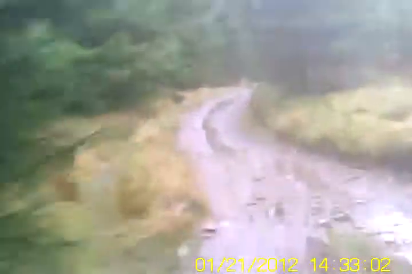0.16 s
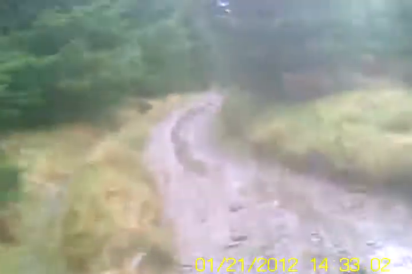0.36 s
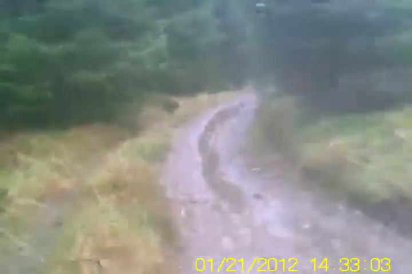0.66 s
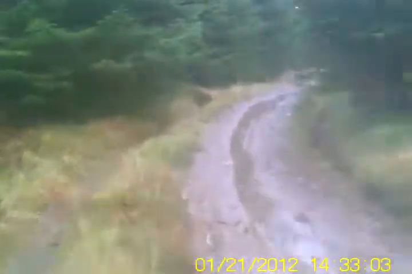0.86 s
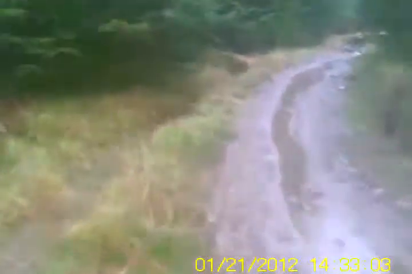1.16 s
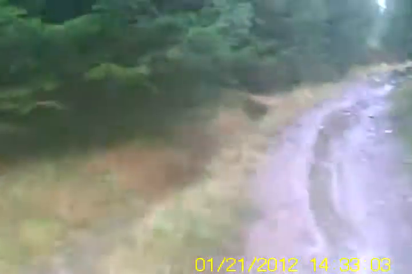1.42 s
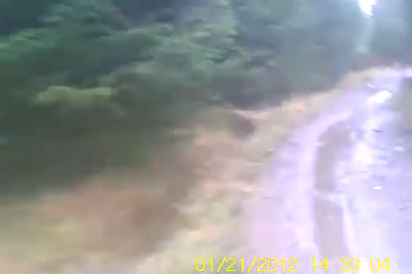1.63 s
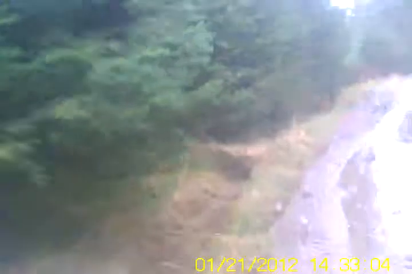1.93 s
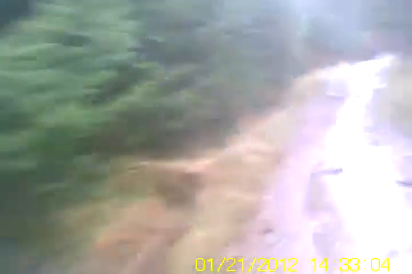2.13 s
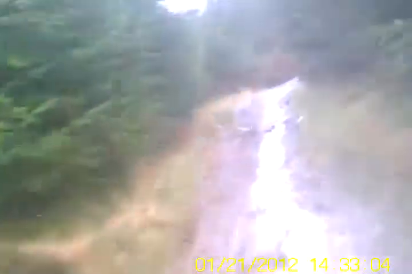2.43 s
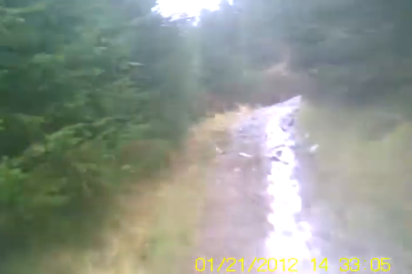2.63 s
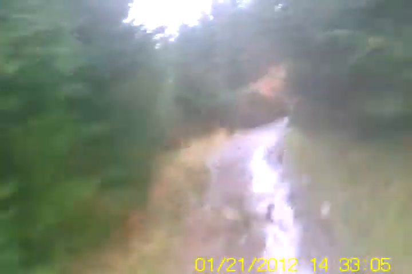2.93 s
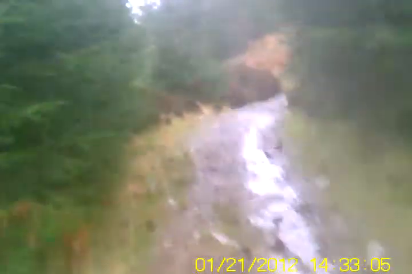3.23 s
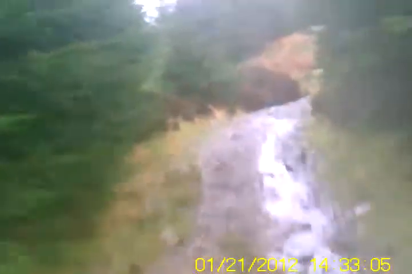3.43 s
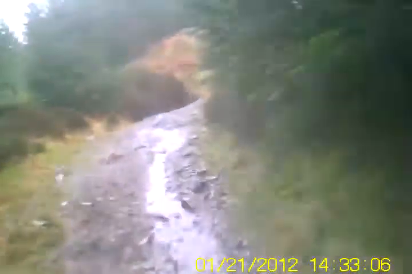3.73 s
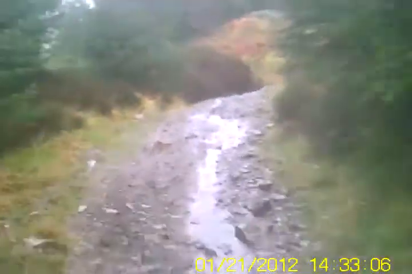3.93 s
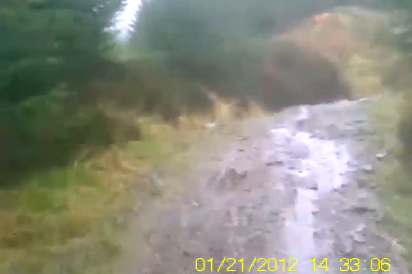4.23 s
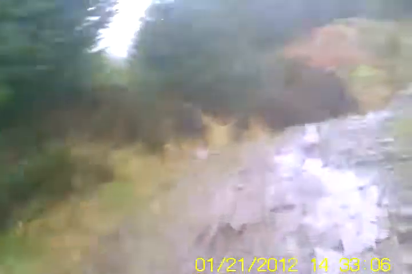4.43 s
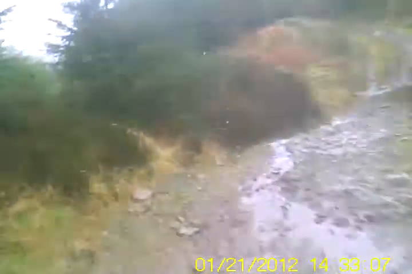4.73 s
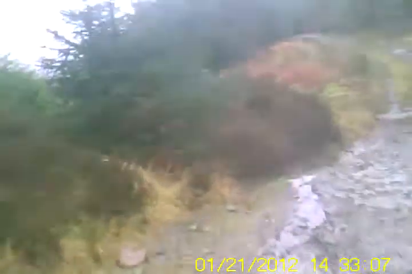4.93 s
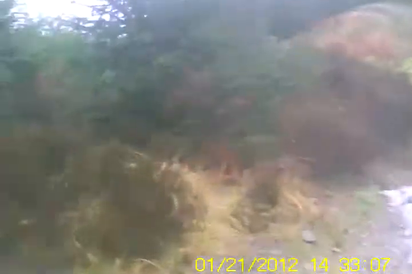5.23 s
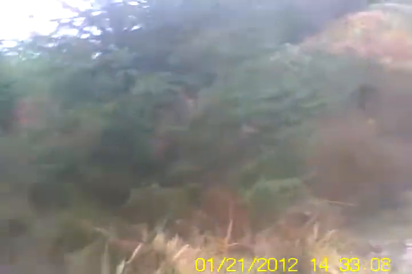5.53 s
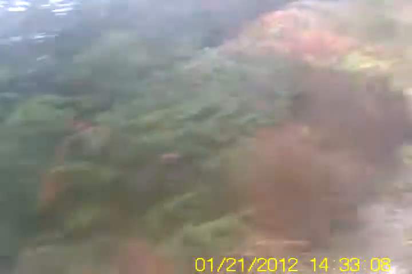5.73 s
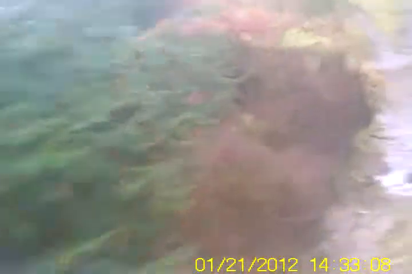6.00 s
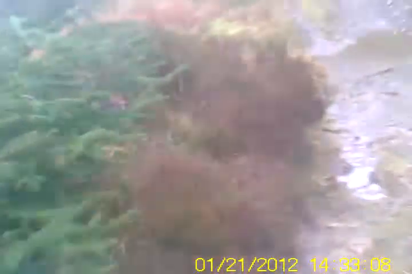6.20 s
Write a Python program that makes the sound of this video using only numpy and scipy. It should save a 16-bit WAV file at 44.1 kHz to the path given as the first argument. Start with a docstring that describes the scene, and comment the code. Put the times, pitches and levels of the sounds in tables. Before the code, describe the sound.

A mountain bike rolls along a wet, stony forest track, heard close from a small microphone riding with it. For the first second the plastic mount clatters and creaks over low wind rumble, soft thumps and crunching grit. The ride is calmer until about 2.6 seconds, when the tyres enter water and a fine spray hisses. A sharp plastic crack and a jolt come at 3 seconds. Rattling, stone knocks and gravel crunch then build, peaking around 4.5 seconds. A faint brake whine starts at 4.7 seconds. At 5 seconds the wet disc brake breaks into loud, stuttering, rasping squeals. From about 5.6 seconds it holds one harsh, buzzing, high screech that slightly overloads the microphone, while wind and tyre noise drop away. It releases at 6.1 seconds, leaving a short dull echo from the trees and a couple of faint ticks.

```python
"""Mountain bike braking on a wet forest track

A small camera rides along over stony ground. Turbulence rumbles at its microphone, the tyres crunch
grit and throw spray, and jolts make the mount thump, creak and chatter. Then a wet disc brake bites:
stick-slip friction drives the disc into a squeal, the trees echo it, and the microphone overloads."""
import sys
import numpy as np
from scipy import signal
from scipy.fft import rfft, irfft
from scipy.io import wavfile
from scipy.ndimage import uniform_filter1d

SR = 44100
rng = np.random.default_rng(int(sys.argv[2]) if len(sys.argv) > 2 else 0)


def bounce(signal):
    """Save signal as a 16-bit WAV file at the path given by the first command-line argument."""
    frames = np.transpose(np.atleast_2d(signal))
    limited = np.clip(frames, -1, 1)
    pcm = np.round(limited * 32767).astype(np.int16)
    wavfile.write(sys.argv[1], SR, pcm)


N = 280476
TIME = np.arange(N) / SR
TOUCH_S, BITE_S, LOCK_S, RELEASE_S = 4.694, 5.0, 5.56, 6.088  # stages of the brake pads' contact
WATER_S = 2.576  # the tyres enter running water


# the disc's lowest mode while the pads bite: time_s, level_db
BITE_LEVEL = [(5.0, -21), (5.07, -17), (5.102, -6.5), (5.15, -9), (5.194, -20), (5.21, -5.5), (5.24, -16),
              (5.28, -4), (5.31, -14), (5.385, -20), (5.45, -9), (5.528, -14.5), (5.55, -4.5)]
# the locked pads briefly lose grip: time_s, recovery_s, buzz_dip_db
GRIP_LOSSES = [(5.644, .011, -8.5), (5.693, 0.006, -4.5), (5.77, .011, -12.5), (5.806, 0.0076, -21),
               (5.882, 0.0092, -5.5), (5.914, 0.0092, -9), (6.046, 0.013, -10.5), (6.067, 0.0035, -11.5)]

def brake(hold_db=-8.5, octave_db=-9, coupling_db=-4.5, drag_db=-24.5):
    """Self-excited vibration: friction feeds two disc modes and couples them nonlinearly."""
    locked = after(LOCK_S, ramp_s=0.017)
    slip_db = sum(db * np.exp(-((TIME - s) / recovery_s) ** 2) for s, recovery_s, db in GRIP_LOSSES)
    phase = 2 * np.pi * np.cumsum(disc_pitch(slip_db)) / SR
    level_db = (1 - locked) * curve(BITE_LEVEL) + locked * (hold_db + 0.6 * slip_db)
    swing = braking() * gain_of(level_db + 1.5 * wander(65))
    low = swing * np.cos(phase)
    octave = swing * np.cos(2 * phase + 0.5 * wander(42)) * gain_of(octave_db + 4.2 * wander(53))
    high = octave + shrieks()
    buzz = locked_buzz(phase, locked, slip_db)
    rasp = pad_rasp(phase, drag=gain_of(drag_db) * swing * (1 - locked))
    coupled = butterworth(high * (low + high / 2), 4, 2200, "high")  # sum tone and upper mode's octave
    return low + high + gain_of(coupling_db) * (1 - locked) * coupled + buzz + rasp


def disc_pitch(slip_db, disc_hz=907, sharp_hz=47.98, settle_s=0.1, lock_rise_hz=23.97, sink_hz_per_s=27):
    """Contact stiffness tunes the lowest mode: grip raises it, slips and the slowing wheel lower it."""
    settling = sharp_hz * np.exp(-(since(BITE_S) / settle_s) ** 2)
    held = after(LOCK_S) * (lock_rise_hz - sink_hz_per_s * (TIME - LOCK_S))
    waver = 1 + 0.0055 * wander(55)  # the disc is uneven
    return (disc_hz + settling + held + 1.52 * slip_db) * waver


def braking(release_db_per_s=612):
    """Friction's drive: 1 while the pads bite, decaying exponentially once they let go."""
    return after(BITE_S) * gain_of(-release_db_per_s * since(RELEASE_S))


# bursts of the disc's upper mode: peak_s, length_s, level_db, pitch_hz
SHRIEK_BURSTS = [(5.062, 0.049, -14, 1830), (5.142, 0.066, -5.5, 1827), (5.182, 0.047, -6, 1740),
                 (5.346, 0.14, -11.5, 1830), (5.469, 0.026, -8.5, 1832), (5.513, 0.053, -4.5, 1802),
                 (5.772, 0.054, -4.5, 1813), (5.979, 0.23, -13, 1854), (6.093, 0.034, -7.5, 1845)]

def shrieks(waver=0.00922):
    """Modal instability: the upper mode runs free in short, unsteady bursts near the octave."""
    clock = np.cumsum(1 + waver * wander(108)) / SR
    return sum(gain_of(db) * swell(s, length) * np.cos(2 * np.pi * hz * clock)
               for s, length, db, hz in SHRIEK_BURSTS)


# spectrum of the locked pads' buzz: frequency_hz, level_db
BUZZ_SPECTRUM = [(1900, -11.5), (2750, 3), (4650, 1), (5500, 2), (5900, -13), (6500, -6), (7300, -12),
                 (9250, -2.5), (9900, -13), (11200, -15), (13000, -26), (15000, -51)]
# spectrum of their scrape: frequency_hz, level_db
SCRAPE_SPECTRUM = [(2000, -14), (5250, 4), (5900, -10), (8100, 5.5), (9300, 6.5), (9900, -4), (15000, -43)]

def locked_buzz(phase, locked, slip_db, level_db=-17, scrape_db=-11.5):
    """Sustained stick-slip: the locked pads add harsh harmonics and noise pulsing at the disc's pitch."""
    harmonics = evened(colour(stick_slip(phase, jitter_rad=0.105, scrape_db=-15), BUZZ_SPECTRUM))
    pulsed_noise = np.exp(np.cos(phase)) * rng.standard_normal(N)
    scrape = patchy(colour(pulsed_noise, SCRAPE_SPECTRUM), depth_db=-3.5) * gain_of(scrape_db)
    envelope = locked * braking() ** 1.35 * gain_of(level_db + slip_db + 0.5 * wander(87))
    return (harmonics + scrape) * envelope


# brief grabs of the pads: start_s, length_s, force_db
PAD_GRABS = [(5.085, 0.067, -23.5), (5.098, 0.009, -10), (5.125, 0.0094, -13), (5.166, 0.0075, -20.5),
             (5.217, 0.0023, -22), (5.281, 0.011, -5.5), (5.32, 0.016, -17), (5.392, 0.0204, -25.5),
             (5.445, 0.047, -19.5), (5.532, 0.018, -25), (5.549, 0.021, -6)]
# spectrum of a grabbing pad: frequency_hz, level_db
RASP_SPECTRUM = [(400, -3), (1200, 4), (2600, 0), (5400, -1), (6500, -16), (9200, -15.5), (13000, -29),
                 (16000, -52.5)]

def pad_rasp(phase, drag):
    """Irregular stick-slip: the rasp grows with pad force, and its hiss grows faster still."""
    friction = stick_slip(phase, jitter_rad=0.34, scrape_db=-3.5)
    force = drag.copy()
    for s, length, db in PAD_GRABS:
        add(force, s, gain_of(db) * signal.windows.tukey(int(length * SR), 0.25))
    return colour(friction, RASP_SPECTRUM) * force + colour(friction, CRACK_SPECTRUM) * force ** 1.49


def stick_slip(phase, jitter_rad, scrape_db):
    """Relaxation oscillation: one slip a cycle, early or late, with a scrape that flares on grit."""
    slip_phase = phase + jitter_rad * wander(240)
    harmonics = evened(sum(gain_of(1.3 * wander(50)) * np.cos(k * slip_phase) for k in range(3, 16)))
    scrape = evened(np.exp(np.cos(phase)) * rng.standard_normal(N) * gain_of(3.5 * wander(18)))
    return evened(harmonics + gain_of(scrape_db) * scrape)


def rub(disc_hz=918, waver_hz=30, level_db=-28.5):
    """Narrow-band resonance: light pad friction stirs the lowest mode into a faint, broken whine."""
    touching = after(TOUCH_S, ramp_s=0.13) * (1 - after(LOCK_S))
    phase = 2 * np.pi * disc_hz * TIME
    whine = wander(waver_hz) * np.cos(phase) + wander(waver_hz) * np.sin(phase)
    return whine * touching * gain_of(level_db)


def ring_out(pitch_hz=1838, level_db=-23, decay_db_per_s=130):
    """Free decay: the released disc's upper mode dies away."""
    envelope = after(RELEASE_S) * gain_of(level_db - decay_db_per_s * since(RELEASE_S))
    return envelope * np.cos(2 * np.pi * pitch_hz * TIME)


# how hard the bike runs, from speed and rough ground together: time_s, level_db
RIDE_LEVEL = [(0.0, -34), (0.64, -38), (2.41, -33), (3.63, -28.5), (4.55, -21), (4.72, -23.5),
              (5.12, -24.5), (5.61, -57), (6.17, -58), (6.36, -56)]

def ride_db():
    """Strength of the ground's excitation, relative to the hardest stretch."""
    level = curve(RIDE_LEVEL)
    return level - level.max()


# patches of loose gravel: middle_s, length_s, boost_db
GRAVEL_PATCHES = [(1.673, 0.1, 3.5), (4.497, 0.085, 9.5)]
# spectra of the shaken frame, the crunching grit and the spray: frequency_hz, level_db
RUMBLE_SPECTRUM = [(60, -18.5), (140, 0.5), (300, 3), (500, -3), (750, -12), (1300, -14), (3000, -96)]
GRIT_SPECTRUM = [(250, -11), (700, 7), (1400, 5), (1750, 10), (2300, 1.5), (3400, 0.5), (4600, -11.5),
                 (8000, -39), (14000, -64)]
SPRAY_SPECTRUM = [(1500, -0.5), (3500, 3), (4800, -6), (5900, 7), (7000, -5.5), (8300, 0), (10000, -14.5),
                  (12300, -25)]

def tyres(water_db=6, drying_db_per_s=9, skid_db=14):
    """Shot noise: clumps of grit shake the frame, crunch under the tread and fly off with the water."""
    clumps, ride = wander(45), ride_db()
    gravel_db = sum(db * swell(s, length) for s, length, db in GRAVEL_PATCHES)
    wet_db = water_db * after(WATER_S, ramp_s=0.004) - drying_db_per_s * since(TOUCH_S)
    skidding = after(LOCK_S) * braking()
    rumble = colour(impacts(per_s=2500, spread_db=3), RUMBLE_SPECTRUM)
    rumble *= gain_of(-33.5 + 0.65 * ride + 4.6 * clumps)
    grit = patchy(colour(impacts(per_s=4000, spread_db=4), GRIT_SPECTRUM), depth_db=3)
    grit *= gain_of(-28.5 + 0.54 * ride + clumps + wander(100) + skid_db * skidding)
    spray = patchy(colour(impacts(per_s=9000, spread_db=3.5), SPRAY_SPECTRUM), depth_db=4.5)
    spray *= gain_of(-43.5 + 0.28 * ride + 2 * clumps + wander(120) + wet_db)
    return (rumble + grit + spray) * gain_of(gravel_db)


# stones knocked by the tyres: start_s, force_db, pitch_hz
STONE_KNOCKS = [(0.211, -15, 1780), (0.257, -12, 1670), (2.946, -11.5, 2020), (3.056, -6.5, 2800),
                (3.083, -15.5, 1590), (3.3196, -13.5, 1380), (3.398, -12, 1920), (3.4246, -13.5, 1920),
                (3.999, -12, 2370), (4.239, -9.5, 1940), (4.287, -9.5, 2190), (4.457, -9.5, 1890),
                (4.4857, -9.5, 1830), (4.839, -11.5, 1890)]

def stones(decay_s=0.0069, bandwidth_hz=900, direct_share=0.34):
    """Damped resonance: a skidding stone's short crunch is coloured by its own broad mode."""
    t, out = TIME[:SR // 10], np.zeros(N)
    for s, db, hz in STONE_KNOCKS:
        force = np.exp(-t / decay_s) * rng.standard_normal(len(t))
        body = signal.lfilter(*signal.iirpeak(hz, hz / bandwidth_hz, fs=SR), force)
        add(out, s, gain_of(db) * (body + direct_share * force))
    return colour(out, GRIT_SPECTRUM) / 2


# bursts of slaps in the plastic mount: start_s, length_s, force_db
CHATTER_BURSTS = [(.0066, 0.013, -10), (0.0949, .018, -5), (.1271, 0.0031, -6.5), (0.2944, 0.0043, -4),
                  (0.3081, 0.0093, 0), (0.5409, 0.0071, -12), (.6407, 0.0093, -10), (0.7341, 0.0074, -6),
                  (.9892, 0.0025, -7.5), (0.9997, 0.0019, -3), (1.1625, 0.004, -10.5),
                  (2.2696, 0.00092, -5), (2.3605, 0.0027, -8.5), (2.9921, 0.011, 5.5), (3.0442, 0.0041, -4),
                  (3.3764, 0.0043, -10), (3.4569, 0.018, -0.5), (3.499, 0.0056, -1.5), (3.5388, 0.01, -6),
                  (3.5804, 0.012, -7.5), (3.634, 0.00027, -4), (3.908, 0.0038, -3), (3.9825, 0, 2.5),
                  (3.9986, .004, 1), (4.0517, 0.014, -3), (4.1098, 0, -4), (4.1876, 0.013, -7.5),
                  (4.2391, 0.0032, -1.5), (4.2865, 0.0066, -2.5), (4.3865, 0, 1.5), (4.4464, 0.018, -5),
                  (4.4982, 0.012, -3.5), (4.5581, 0.0076, 0.5), (4.5753, 0, -2.5), (4.595, 0.0072, -4),
                  (4.6545, 0.00055, 8.5), (4.678, 0.0053, -3.5), (4.7337, 0.0093, -8), (6.303, 0.0025, -27),
                  (6.336, .004, -29)]
# spectrum of one slap: frequency_hz, level_db
SLAP_SPECTRUM = [(100, -5), (500, 10.5), (1200, 4), (3500, 3.5), (5500, 0.5), (7000, -10), (9200, -4.5),
                 (10500, -17), (13000, -27.5), (16000, -56)]

def chatter(spacing_s=0.0046, rebound_db=-20, rattle_per_s=10, rattle_db=-12):
    """Contact rattle: loose parts slap milliseconds apart, and each slap sheds tiny rebounds."""
    # light slaps fall at random between the bursts, harder the rougher the ride
    slaps = (rng.random(N) < rattle_per_s / SR) * gain_of(rattle_db + ride_db() + 2 * rng.standard_normal(N))
    bounces = impacts(per_s=5000, spread_db=3)
    chances = rng.uniform(-1, 1, (len(CHATTER_BURSTS), 2, 12))
    for (s, length, db), chance in zip(CHATTER_BURSTS, chances):
        steps = np.linspace(0, 1, round(length / spacing_s) + 1)
        for progress, late, size in zip(steps, *chance):
            arch = np.sin(np.pi * progress)  # a burst is strongest in its middle
            slap_s = s + progress * length + late * arch * spacing_s / 10
            add(slaps, slap_s, gain_of([db + 2 * arch + 2 * size]))
    rebounds = signal.oaconvolve(slaps, np.exp(-TIME[:1000] / 0.0015))[:N] * bounces
    return colour(slaps + gain_of(rebound_db) * rebounds, SLAP_SPECTRUM) * gain_of(3.5)


# cracks that end the hardest slaps: start_s, force_db
PLASTIC_CRACKS = [(0.31, -11), (2.994, 1), (3.0046, -3), (4.564, -7)]
# spectrum of a crack, and of the pads' hiss: frequency_hz, level_db
CRACK_SPECTRUM = [(3500, -21.5), (5500, -4), (9000, -4), (15000, -24.5)]

def cracks(decay_s=0.00066):
    """Hard impact: a very brief contact of plastic gives a wide, bright spectrum."""
    t, out = TIME[:SR // 10], np.zeros(N)
    for s, db in PLASTIC_CRACKS:
        add(out, s, gain_of(db) * np.exp(-t / decay_s) * rng.standard_normal(len(t)))
    return colour(out, CRACK_SPECTRUM)


# jolts that heave the bike: peak_s, level_db, swing_hz
JOLT_PULSES = [(.266, -12, 32), (1.033, -16, 32), (1.118, -19, 150), (1.123, -14, 34), (3.055, -9, 22),
               (3.51, -8, 21), (4.234, -8, 130), (4.24, -10, 270), (4.248, -8, 28), (4.605, -10, 20),
               (5.56, -16, 70)]

def jolts():
    """Pressure pulse: the bike dips, is thrown up and settles in one slow swing."""
    out = np.zeros(N)
    for s, db, hz in JOLT_PULSES:
        phase_squared = (np.pi * hz * (TIME - s)) ** 2
        out += gain_of(db) * (1 - 2 * phase_squared) * np.exp(-np.minimum(phase_squared, 20))
    return out


# creaks of the flexing mount: start_s, relative_level_db, glide_ratio
MOUNT_CREAKS = [(0.019, -29.5, -.1), (0.099, -24, -0.33), (0.222, -29.5, -0.036), (0.518, -29, 0.27),
                (0.654, -30.5, 0.13), (0.722, -33, 0.29), (0.992, -33, -.1), (2.996, -19.5, -0.16),
                (3.463, -24, -0.32), (3.525, -28, 0.37), (4.371, -28.5, 0.28), (4.558, -20.5, -0.28),
                (4.654, -25, -.25), (5.222, -27.5, 0.24), (5.787, -33.5, 0.2), (6.177, -39.5, 0.18)]

def creaks(middle_hz=418, bend=0.12, roughness=0.38):
    """Friction under flexure: the mount's short, grainy groan glides with the load."""
    out = np.zeros(N)
    for s, db, glide in MOUNT_CREAKS:
        length_s = 0.05 * gain_of(db) ** 0.14  # a harder creak lasts longer
        position = np.linspace(-1, 1, int(length_s * SR))
        hz = middle_hz * (1 + glide * position / 2 + bend * position ** 2)
        add(out, s, gain_of(db) * np.sqrt(1 - position ** 2) * np.sin(2 * np.pi * np.cumsum(hz) / SR))
    return out * (1 + roughness * wander(156)) * gain_of(3)


# flicked stones striking metal: start_s, pitch_hz, level_db
METAL_PINGS = [(2.738, 1570, -14), (4.8735, 1690, -15)]

def pings(decay_s=0.009):
    """Impulse response: struck metal rings in one short, gritty note."""
    t, out = TIME[:SR // 10], np.zeros(N)
    for s, hz, db in METAL_PINGS:
        add(out, s, gain_of(db) * np.exp(-t / decay_s) * np.sin(2 * np.pi * hz * t))
    return out * (1 + 0.5 * wander(540))


def splash(peak_s=2.965, length_s=0.92, level_db=-40, lowest_hz=3200):
    """Superposed droplet impacts: a fine hiss swells and passes as the front tyre meets the water."""
    drops = colour(impacts(per_s=16000, spread_db=11), SPRAY_SPECTRUM)
    hiss = evened(butterworth(drops, 4, lowest_hz, "high"))
    return hiss * gain_of(level_db) * after(WATER_S, ramp_s=0.004) * swell(peak_s, length_s)


# wet grit leaving the tyre: peak_s, level_db
GRIT_SPITS = [(2.939, -29.5), (4.919, -25.5), (4.952, -17.5)]

def spits(length_s=0.012):
    """Noise transients: the tyre flings off wet grit in brief bursts of spray."""
    envelope = sum(gain_of(db) * swell(s, length_s) for s, db in GRIT_SPITS)
    return colour(rng.standard_normal(N) * envelope, SPRAY_SPECTRUM)


# air rushing over the microphone: time_s, relative_level_db
WIND_LEVEL = [(0.0, -31.5), (0.67, -43.5), (2.25, -37), (3.79, -29), (5.0, -32.5), (5.72, -59.5),
              (6.36, -44)]
# spectrum of its turbulence: frequency_hz, level_db
WIND_SPECTRUM = [(10, -4.5), (22, 6.5), (35, -4.5), (55, -8), (74, -2.5), (105, -12), (180, -24),
                 (400, -66.5)]

def wind(gain_db=8, gust_hz=8.9, sway_hz=31.8, sway_db=-26.5):
    """Turbulent pressure: low gusts buffet the microphone, over the slow sway of the camera."""
    turbulence = evened(colour(rng.standard_normal(N), WIND_SPECTRUM))
    gusts = turbulence * gain_of(gain_db + curve(WIND_LEVEL) + wander(gust_hz))
    sway = wander(sway_hz) * gain_of(sway_db + 0.22 * ride_db())
    return gusts + sway


def forest(x, reverb_s=0.58, top_hz=1400):
    """Scattering with motion shift: trunks ahead return dull echoes higher, those behind lower."""
    t, out = TIME[:SR], np.zeros(N)
    for approach, delay_s, db in [(0.084, 0.09, -0.5), (0.045, 0.026, -0.5), (-0.11, 0.02, -10)]:
        shifted = np.interp(TIME - delay_s + approach * (TIME - RELEASE_S), TIME, x)
        tail = rng.standard_normal(SR) * gain_of(-60 * t / reverb_s)
        out += signal.fftconvolve(shifted, gain_of(db) * tail / np.linalg.norm(tail))[:N]
    return butterworth(out, 2, top_hz, "low")


def impacts(per_s, spread_db):
    """Random impulses, most small and a few large, at rms 1."""
    size = gain_of(spread_db * np.minimum(rng.exponential(1, N), 4))
    return evened(size * rng.choice([-1, 1], N) * (rng.random(N) < per_s / SR))


def patchy(x, depth_db):
    """Spectral flicker: each grain has its own pitch, so narrow bands flare for milliseconds."""
    bands = signal.stft(x, nperseg=256, noverlap=192)[2]
    across_bands = uniform_filter1d(rng.standard_normal(bands.shape), size=4, axis=0)
    patches = evened(uniform_filter1d(across_bands, size=6, axis=1))
    return evened(signal.istft(bands * gain_of(depth_db * patches), nperseg=256, noverlap=192)[1][:N])


def colour(x, spectrum):
    """Minimum-phase filter of unit energy with the given spectrum."""
    hz, db = np.transpose(spectrum)
    f = abs(np.fft.fftfreq(2 ** 13, 1 / SR))
    rolloff_db = 40 * np.log10(np.maximum(f / hz[-1], 1))
    log_gain = np.log(gain_of(np.interp(np.log(f + 1), np.log(hz), db) - rolloff_db))
    taps = np.fft.ifft(np.exp(np.conj(signal.hilbert(log_gain)))).real[:len(f) // 2]
    return signal.oaconvolve(x, taps / np.linalg.norm(taps))[:N]


def butterworth(x, order, cutoff_hz, kind):
    """Maximally flat low-pass or high-pass filter."""
    return signal.sosfilt(signal.butter(order, cutoff_hz, kind, fs=SR, output="sos"), x)


def wander(rate_hz):
    """Smooth random fluctuation of rms 1, up to the given rate."""
    f = np.fft.rfftfreq(N, 1 / SR)
    return evened(irfft(rfft(rng.standard_normal(N)) / (1 + (f / rate_hz) ** 4), N))


def after(s, ramp_s=0.032):
    """Rises from 0 to 1 around time s."""
    return np.clip((TIME - s) / ramp_s + 0.5, 0, 1)


def since(s):
    """Seconds elapsed since time s, 0 before it."""
    return np.maximum(TIME - s, 0)


def swell(s, length_s):
    """A smooth arch of height 1 that peaks at time s."""
    return np.cos(np.pi * np.clip((TIME - s) / length_s, -0.5, 0.5)) ** 2


def curve(rows):
    """Joins rows of (time_s, value) by straight lines."""
    return np.interp(TIME, *np.transpose(rows))


def gain_of(db):
    """Decibels to amplitude."""
    return 10 ** (np.asarray(db) / 20)


def evened(x):
    """Scales to rms 1."""
    return x / np.sqrt(np.mean(x ** 2) + 1e-20)


def add(mix, s, sound):
    """Mixes a sound in at time s."""
    part = mix[max(round(s * SR), 0):][:len(sound)]
    part += sound[:len(part)]


def scene(echo_db=-21):
    """Superposition at the camera: the squeal, its echo from the trees and the noise of the ride."""
    squeal = brake() + rub() + ring_out()
    echo = gain_of(echo_db) * forest(squeal)
    ride = wind() + tyres() + splash() + stones() + pings()
    ride += chatter() + cracks() + spits() + jolts() + creaks()
    return (squeal + echo + ride)[None]


def record(dry, treble_hz=13500, edge_hz=15800):
    """Saturation and band limiting: the small microphone clips at full scale and loses the top treble."""
    heard = butterworth(np.clip(dry, -1, 1), 8, treble_hz, "low")
    band_limit = signal.firwin(255, edge_hz, window=("kaiser", 9), fs=SR)
    return signal.oaconvolve(heard, band_limit[None], "same")


dry = scene()
out = record(dry)
bounce(out)
```